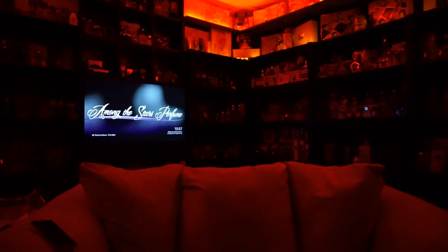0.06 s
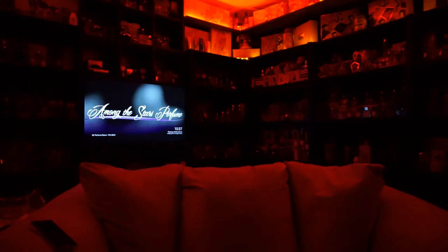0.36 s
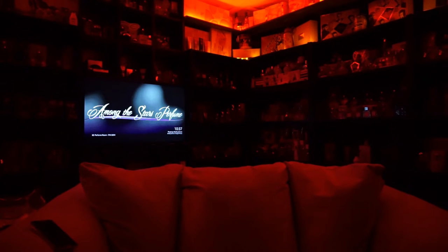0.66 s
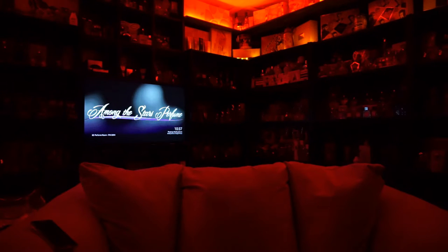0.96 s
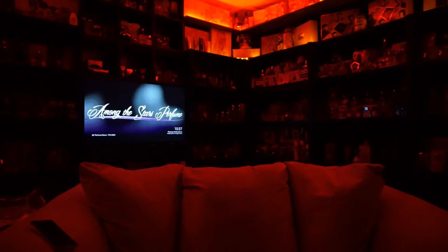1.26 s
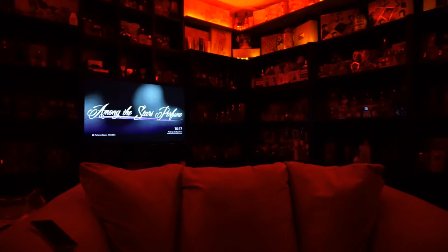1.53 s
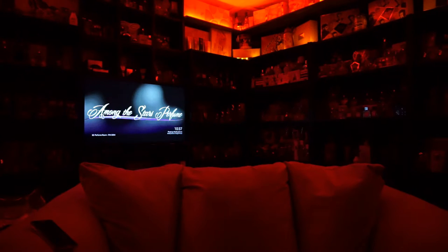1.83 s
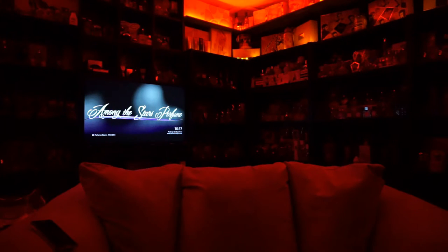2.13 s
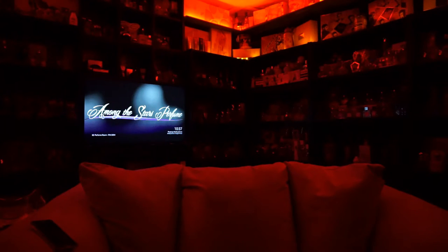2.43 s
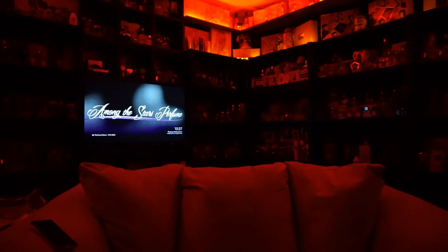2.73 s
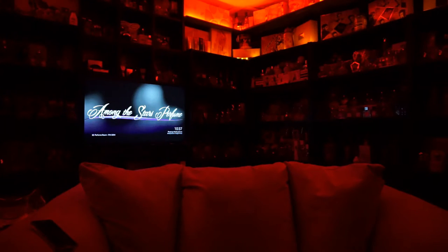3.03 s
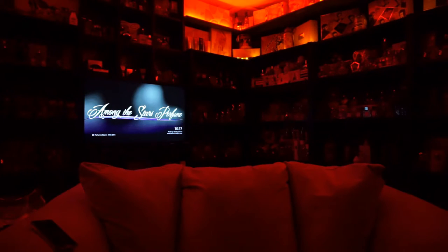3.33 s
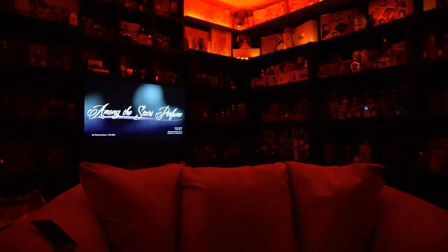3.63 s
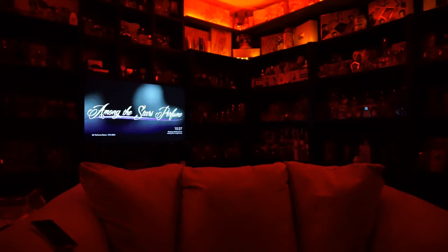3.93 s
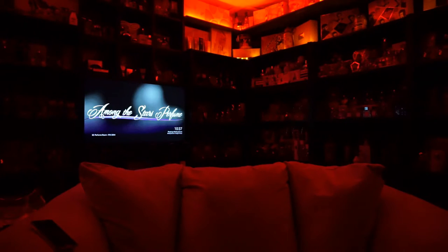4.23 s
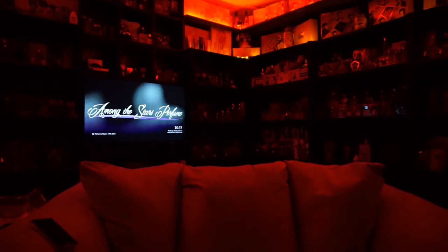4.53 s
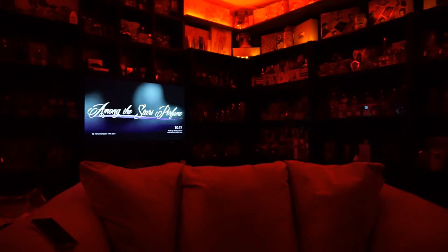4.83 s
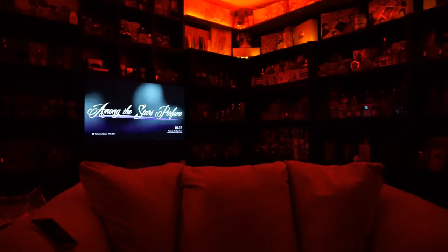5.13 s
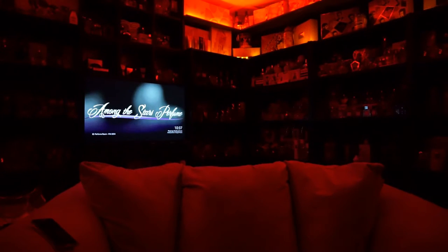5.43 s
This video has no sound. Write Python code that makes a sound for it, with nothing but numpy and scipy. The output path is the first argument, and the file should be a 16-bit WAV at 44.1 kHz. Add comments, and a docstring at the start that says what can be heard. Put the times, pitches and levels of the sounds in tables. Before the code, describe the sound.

Close, quiet handling sounds in a small room with little echo. Padded thuds like steps and light hollow taps lead to a sharp plastic snap, the loudest sound, followed by a run of knocks and short slides on a shelf with a deep bump. Clothes rub and swish, a small hard thing clinks as it is set down, and a spring catch clicks shut. A faint hiss lies underneath.

```python
"""Someone moves about a small, quiet, furnished room, starting with light taps, clicks and soft thuds.
About two seconds in, stiff plastic snaps free; a hard thing knocks and slides on a shelf, and
furniture gets a deep bump. Then come tiny cracks, a clink and, near the end, a sprung catch.
Each blow shakes a thing, which rings with its own tones and echoes briefly in the room.
All along, clothes rustle as they rub and glide, over a faint hiss."""
import sys
import numpy as np
from scipy import signal
from scipy.fft import rfft, irfft
from scipy.io import wavfile
from scipy.ndimage import uniform_filter1d

SR = 44100
rng = np.random.default_rng(int(sys.argv[2]) if len(sys.argv) > 2 else 0)


def generate_wav(sig):
    """Save sig (samples, or channels by samples) to the path in sys.argv[1] as 16-bit PCM at SR."""
    pcm = np.round(np.clip(np.atleast_2d(sig).T, -1, 1) * 32767).astype(np.int16)
    wavfile.write(sys.argv[1], SR, pcm)


N = 250488

# Knocks and pushes on the shelf: start_s, level_db, contact_s, treble_db
KNOCKS = [(2.267, -30.5, 0.0042, 7), (2.316, -25.5, 0.0036, 1), (2.343, -27.5, 0.0061, -3),
          (2.355, -31.5, 0.026, 0.5), (2.42, -33.5, 0.0058, 0.5), (2.499, -32.5, 0.0061, -9),
          (2.519, -33, 0.0064, -4.5), (2.644, -34, 0.017, -3), (2.898, -33.5, .007, -4),
          (2.979, -40.5, 0.0093, -41), (3.156, -39.5, 0.0068, -7.5), (3.5, -34, 0.005, -26),
          (3.592, -30, 0.0033, -8.5), (3.681, -35, 0.015, -5.5), (3.699, -37.5, 0.026, -28),
          (5.655, -38, 0.0086, -28)]
SLIDES = [(2.59, -42, 0.13, -10), (2.746, -44.5, 0.1, -1), (3.096, -49, 0.034, -50)]
# The thing's colour (how strong its lows and highs are): pitch_hz, gain_db
KNOCK_COLOUR = [(150, -50), (340, -68), (520, -2.5), (1400, -4.5), (2300, -7.5), (4000, -13.5),
                (6200, -22.5), (8000, -31), (15000, -39)]
# The tones it rings with (narrow ones ring longer): pitch_hz, width_hz, gain_db
KNOCK_TONES = [(535, 34, 2), (865, 65, 4), (1230, 50, 0), (1890, 100, 8), (2100, 130, 3.5),
               (5900, 260, -21)]

def shelf_knocks():
    """A hard thing held in the hand bumps on a shelf; a long contact makes a slide."""
    return blows(KNOCKS + SLIDES, KNOCK_COLOUR, KNOCK_TONES, tick_db=-13, pan_db=0.4, softness=0.21,
                 ripple_db=4, room_db=-3, bass_db=-7, held=True, left_lead_s=.00003, treble_hz=2920)

# The snap: start_s, level_db, contact_s, treble_db
SNAP = [(2.206, -19, 0.014, 0)]
# The plastic's colour: pitch_hz, gain_db
SNAP_COLOUR = [(120, -42), (300, -54), (1100, -6), (3500, -1), (5000, -8.5), (9000, -12.5), (15000, -12)]
# Its tones: pitch_hz, width_hz, gain_db
SNAP_TONES = [(486, 34, -1), (1034, 38, 3), (1278, 27, 22), (2470, 240, 5.5), (3150, 63, 12),
              (6130, 59, -0.5)]

def plastic_snap():
    """Stiff plastic snaps free and rings."""
    return blows(SNAP, SNAP_COLOUR, SNAP_TONES, tick_db=-8.5, pan_db=-1.5, softness=0.15,
                 ripple_db=3, room_db=-1.5, bass_db=5.5)

# Two touches on landing: start_s, level_db, contact_s, treble_db
CLINK = [(4.4935, -21.5, 0.0035, -0.5), (4.549, -41, 0.0091, -6)]
# The small thing's colour: pitch_hz, gain_db
CLINK_COLOUR = [(150, -45), (330, -2.5), (900, -24), (3000, -33), (4500, -20), (9000, -21), (15000, -39)]
# Its tones: pitch_hz, width_hz, gain_db
CLINK_TONES = [(986, 46, 14), (1294, 96, 12.5), (2460, 110, 1), (2840, 195, 5)]

def clink():
    """A small hard thing rings as it is set down."""
    return blows(CLINK, CLINK_COLOUR, CLINK_TONES, tick_db=-14, pan_db=-1, softness=0.15,
                 ripple_db=-0.5, room_db=-4, bass_db=-4.5, left_lead_s=-0.00042)

# Padded blows: start_s, level_db, contact_s, treble_db
THUDS = [(.369, -34.5, 0.019, 18), (1.311, -36, 0.0077, 4.5), (1.6735, -25, 0.0074, -3),
         (4.421, -43, 0.017, -29)]
# Their dull colour: pitch_hz, gain_db
THUD_COLOUR = [(100, -80), (220, -7), (400, -4), (800, 2.5), (1200, -15), (2400, -27), (4500, -49),
               (15000, -60)]
# Their tones: pitch_hz, width_hz, gain_db
THUD_TONES = [(365, 76, -8), (633.6, 38, 7), (767, 57, -7.5)]

def thuds():
    """Padded blows land softly, like steps."""
    return blows(THUDS, THUD_COLOUR, THUD_TONES, tick_db=-14, pan_db=0, softness=0.21,
                 ripple_db=4.5, room_db=-2, bass_db=-11.5, left_lead_s=.00004, treble_hz=1150)

# The catch's three moves: start_s, level_db, contact_s, treble_db
CATCH = [(5.258, -33.5, 0.021, -12.5), (5.272, -36, 0.056, 2), (5.296, -31, 0.012, 7)]
# Its colour: pitch_hz, gain_db
CATCH_COLOUR = [(120, -33), (350, -29), (800, -9), (1300, 4.5), (2700, 1), (4200, -4), (9000, -21),
                (15000, -12)]
# Its tones: pitch_hz, width_hz, gain_db
CATCH_TONES = [(1800, 49, 14), (2217, 51, 13), (2485, 60, 11.5), (4920, 120, 5), (5820, 240, 1.5),
               (8100, 200, 0.5), (9620, 170, 3)]

def sprung_catch():
    """A catch on a spring gives, scrapes and shuts."""
    return blows(CATCH, CATCH_COLOUR, CATCH_TONES, tick_db=-32, pan_db=-1.2, softness=0.034,
                 ripple_db=4.5, room_db=-1.5, bass_db=9)

# Deep bumps: start_s, level_db, contact_s, treble_db
BUMPS = [(2.915, -31, 0.0075, 0.88), (3.507, -46.5, 0.018, 0), (4.436, -48, 0.024, 0)]
# The furniture's colour: pitch_hz, gain_db
BUMP_COLOUR = [(70, -31), (150, -7), (600, -12), (1500, -8), (9000, -49)]
# Its tones: pitch_hz, width_hz, gain_db
BUMP_TONES = [(127, 18, -5.5), (223, 43, 3), (523, 83, 6.5)]

def furniture_bumps():
    """Bumped furniture answers with low tones."""
    return blows(BUMPS, BUMP_COLOUR, BUMP_TONES, tick_db=-5, pan_db=-0.5, softness=0.81,
                 ripple_db=-14.5, room_db=-4, bass_db=-1)

# Clicks and scuffs: start_s, level_db, contact_s, treble_db
CLICKS = [(.118, -48, 0.019, 7), (.669, -45.5, 0.011, 6.5), (.838, -38.5, 0.0086, -8.5),
          (.874, -46.5, 0.0031, -18), (1.612, -48, 0.0012, -7), (1.722, -49, 0.03, 1),
          (1.953, -49, 0.0083, -7), (2.166, -36.5, 0.021, 10.5), (2.193, -33, 0.0059, 10),
          (3.508, -42.5, 0.0054, 5), (5.4135, -36.5, 0.016, 6)]
# Their crisp colour: pitch_hz, gain_db
CLICK_COLOUR = [(120, -52), (350, 1), (1800, 7), (3000, 6), (5000, -4.5), (9000, -8.5), (15000, -12.5)]
# Their one tone: pitch_hz, width_hz, gain_db
CLICK_TONES = [(1150, 120, 1)]

def handling_clicks():
    """Things click and scuff as they are handled."""
    return blows(CLICKS, CLICK_COLOUR, CLICK_TONES, tick_db=-17, pan_db=0, softness=0.2,
                 ripple_db=2.5, room_db=-4.5, bass_db=-4, treble_hz=5600)

# Tiny cracks: start_s, level_db, contact_s, treble_db
CRACKS = [(4.4355, -39.5, 0.0011, -7), (4.442, -34, 0.0031, -5), (4.4593, -37, 0.0016, -6),
          (4.4623, -36.5, 0.0013, -8), (5.421, -48, 0.0004, 7)]
# Their bright colour: pitch_hz, gain_db
CRACK_COLOUR = [(150, -15), (400, -1), (1700, 1), (5000, -5), (10000, -2), (15000, -16)]
# Their tones: pitch_hz, width_hz, gain_db
CRACK_TONES = [(1620, 85, 9.5), (13800, 690, 3)]

def dry_cracks():
    """Little cracks, so close that they have hardly any echo."""
    return blows(CRACKS, CRACK_COLOUR, CRACK_TONES, tick_db=-20, pan_db=0.5, softness=0.6,
                 ripple_db=2, room_db=-13, bass_db=2)

# Light touches: start_s, level_db, contact_s, treble_db
TAPS = [(.212, -50, 0.01, -2), (.245, -40, 0.0037, -11), (.724, -39.5, 0.0019, -12.5),
        (.951, -46, 0.0073, -16), (.981, -43, 0.0036, -21), (1.031, -41, 0.003, -5),
        (1.776, -46.5, 0.0024, -19)]
# The hollow thing's colour: pitch_hz, gain_db
TAP_COLOUR = [(150, -75), (400, 1.5), (750, -5), (2500, -14), (5000, -16), (15000, -32)]
# Its tones: pitch_hz, width_hz, gain_db
TAP_TONES = [(543, 44, 2), (990, 73, -0.5), (1760, 80, 2), (2850, 200, -3), (3430, 190, 2)]

def hollow_taps():
    """A small hollow thing rings at a light touch."""
    return blows(TAPS, TAP_COLOUR, TAP_TONES, tick_db=-69, pan_db=2, softness=0.4,
                 ripple_db=-4, room_db=-4.5, bass_db=-10, treble_hz=2300)

# Soft shuffles: start_s, level_db, contact_s, treble_db
SHUFFLES = [(1.242, -53.5, 0.033, -2), (4.067, -46.5, 0.06, 0), (4.11, -41.5, 0.017, 2)]
# Their hollow colour: pitch_hz, gain_db
SHUFFLE_COLOUR = [(150, -48), (500, -1.5), (650, -19), (1350, 0), (1600, -19), (4000, -31), (15000, -50)]
# Their one tone: pitch_hz, width_hz, gain_db
SHUFFLE_TONES = [(840, 71, 4.5)]

def shuffles():
    """Long, gentle contacts make a hollow shuffling."""
    return blows(SHUFFLES, SHUFFLE_COLOUR, SHUFFLE_TONES, tick_db=-21, pan_db=0.5, softness=0.85,
                 ripple_db=2.5, room_db=-6, bass_db=-3)

def blows(rows, colour, tones, tick_db, pan_db, softness, ripple_db, room_db, bass_db,
          held=False, left_lead_s=0, treble_hz=4000, size=16384):
    """Each blow is a tick and a burst of contact noise that set the thing and the room ringing."""
    t, hz, out = np.arange(size) / SR, np.fft.rfftfreq(size, 1 / SR), np.zeros((2, N))
    low_cut = 1 / (1 + (125 / (hz + 30)) ** 8)
    ripple = evened(uniform_filter1d(uniform_filter1d(rng.standard_normal(len(hz)), 50), 30))
    overtones_db = ripple_db * ripple * hz / (hz + 2000)  # many weak high tones, alike in every blow
    tick = gain_of(tick_db) * evened(np.exp(-t / .00007))
    delay = np.exp(-2j * np.pi * hz * np.maximum([[-left_lead_s], [left_lead_s]], 0))
    for start_s, level_db, contact_s, treble_db in rows:
        power = (gain_of(2 * read(colour, hz)) + ringing(hz, tones, held)) * low_cut
        shape_db = overtones_db + 10 * np.log10(power) + bass_and_treble(hz, bass_db, treble_db, treble_hz)
        swell = 1 - np.exp(-t / (softness * min(contact_s, .014)))  # a soft contact starts gently
        chatter = evened(rng.standard_normal((2, size)) * swell * np.exp(-t / contact_s))
        drive = tick + stereo(chatter + gain_of(room_db) * room_echo(t))
        sound = irfft(rfft(drive) * delay * struck_filter(shape_db))
        opening_level = np.sqrt(np.mean(sound[:, :round(.02 * SR)] ** 2))
        add(out, start_s, gain_of(level_db) * sound / opening_level)
    return pan(out, pan_db)

def ringing(hz, tones, held, grip_detune=.04, grip_db=5):
    """How strongly a thing rings at each pitch; if held, the grip shifts each tone's pitch and level."""
    power = 0
    for pitch_hz, width_hz, gain_db in tones:
        pitch_shift, level_shift = held * rng.uniform(-1, 1, 2)
        pitch_hz *= 1 + grip_detune * pitch_shift
        away = 2 * (hz - pitch_hz)
        peak = gain_of(2 * (gain_db + grip_db * level_shift))
        power += peak / (1 + (away / width_hz) ** 2) / (1 + (away / pitch_hz) ** 4)
    return power

def struck_filter(db):
    """A filter with these gains that makes no sound before the blow (minimum phase)."""
    cepstrum = irfft(np.log(gain_of(db)))
    half = len(cepstrum) // 2
    cepstrum[1:half] *= 2
    cepstrum[half + 1:] = 0
    return np.exp(rfft(cepstrum))

# Faint high rings: start_s, level_db, pitch_hz
PINGS = [(.675, -47.5, 5980), (1.032, -50.5, 6440), (3.842, -53, 2640), (4.498, -35.5, 6240)]

def pings(attack_s=.0038, fade_60db_s=.2, width_hz=420, size=16384):
    """A nudged small thing rings at one high pitch, heard mostly off the walls."""
    t, hz, out = np.arange(size) / SR, np.fft.rfftfreq(size, 1 / SR), np.zeros((2, N))
    for start_s, level_db, pitch_hz in PINGS:
        band = 1 / (1 + (2 * (hz - pitch_hz) / width_hz) ** 2)
        ring = evened(irfft(rfft(rng.standard_normal((2, size))) * band))
        envelope = gain_of(level_db - 60 * t / fade_60db_s) * (1 - np.exp(-t / attack_s))
        add(out, start_s, envelope * ring)
    return out

# Dull, sticky rubs of cloth: start_s, length_s, level_db, treble_db
RUBS = [(0, 0.066, -47, -2), (.46, 0.033, -52, -44), (.69, 0.16, -48.5, -55), (.803, 0.092, -43.5, -12.5),
        (.94, 0.073, -50.5, -15), (1.545, 0.044, -46.5, -15), (1.74, 0.16, -49.5, -62),
        (2.08, 0.032, -46.5, -2), (2.125, 0.06, -43, -8), (2.84, 0.035, -48, -6), (2.89, 0.11, -43.5, -11),
        (3.305, 0.046, -47, -7.5), (3.35, 0.044, -41, -6.5), (3.405, 0.11, -34.5, -10.5),
        (3.56, 0.06, -43.5, -8), (3.7, 0.069, -56, -38), (3.985, 0.025, -51, -6), (4.12, 0.043, -42, -9.5),
        (5.19, 0.014, -52.5, -3), (5.41, 0.041, -42, -12), (5.48, 0.48, -56, -21)]

def cloth_rubs(attack_s=.001, release_s=.029, usual_db=-47.5):
    """Cloth under pressure takes hold, rubs and lets go."""
    def stroke(t, hz, start_s, length_s, level_db, treble_db):
        age = np.maximum(t - start_s, 0)
        envelope = (1 - np.exp(-age / attack_s)) * np.exp(-np.maximum(age - length_s, 0) / release_s)
        bass_db = 1.02 * (level_db - usual_db)  # pressing harder brings out the bass
        return envelope * gain_of(level_db + bass_and_treble(hz, bass_db, treble_db))
    return cloth_friction(RUBS, stroke, slip_share=0.18, patchy_db=2, pan_db=-0.8)

# Smooth glides of cloth: start_s, peak_time_s, level_db, bass_db
SWISHES = [(.8, 1.05, -51.5, 2), (3.98, 4.42, -45, -2), (5.28, 5.43, -46.5, 15.5)]

def cloth_swishes(fade_db_per_s=14):
    """Freely gliding cloth makes a hiss that swells and slowly dies."""
    def stroke(t, hz, start_s, peak_time_s, level_db, bass_db):
        swell = np.clip((t - start_s) / (peak_time_s - start_s), 0, 1)
        fade_db = fade_db_per_s * np.maximum(t - peak_time_s, 0)
        return swell * gain_of(level_db - fade_db + bass_and_treble(hz, bass_db, 0))
    return cloth_friction(SWISHES, stroke, slip_share=0.007, patchy_db=.6, pan_db=-2)

# The colour of rustling clothes: pitch_hz, gain_db
CLOTH_COLOUR = [(90, -37.5), (280, -6.5), (450, -3.5), (880, 3), (1300, -1), (2800, -2), (4300, -9),
                (8000, -15), (15500, -16.5)]

def cloth_friction(rows, stroke, slip_share, patchy_db, pan_db,
                   slips_per_s=70, spread_db=4, slip_s=.0065):
    """Rubbing noise shaped by each stroke; part of it grips and slips in little scuffs."""
    slips = (rng.random(N) < slips_per_s / SR) * gain_of(spread_db * np.minimum(rng.exponential(1, N), 2))
    scuffs = evened(signal.lfilter([1], [1, -np.exp(-1 / (slip_s * SR))], slips))
    noise = rng.standard_normal((2, N)) * np.sqrt(1 - slip_share + slip_share * scuffs ** 2)
    hz, t, bands = signal.stft(coloured(stereo(noise), CLOTH_COLOUR), SR, nperseg=512, noverlap=384)
    patches = uniform_filter1d(rng.standard_normal(bands.shape[1:]), 5, axis=0)  # uneven across pitch
    patches = evened(uniform_filter1d(patches, 12, axis=1))  # and over time
    strokes = np.sqrt(sum(stroke(t, hz[:, None], *row) ** 2 for row in rows))
    bands *= strokes * gain_of(patchy_db * patches)
    return pan(signal.istft(bands, SR, nperseg=512, noverlap=384)[1][:, :N], pan_db)

# How long the room echoes: pitch_hz, fade_60db_s
ECHO_TIMES = [(100, 0.31), (500, 0.17), (1500, 0.11), (5000, 0.2), (15000, 0.13)]

def room_echo(t):
    """Many reflections blur together, each pitch dying at its own speed."""
    hz, age, bands = signal.stft(rng.standard_normal((2, len(t))), SR, nperseg=256)
    bands *= gain_of(-60 * age / read(ECHO_TIMES, hz)[:, None])
    echo = signal.istft(bands, SR, nperseg=256)[1][:, :len(t)]
    return evened(echo * (1 - np.exp(-t / 0.015)))

# The colour of the hiss: pitch_hz, gain_db
HISS_COLOUR = [(25, -26), (110, -16.5), (250, -6), (480, 8.5), (900, 4), (1400, 4), (2600, 5.5),
               (5000, -4.5), (15000, -10)]

def hiss(level_db=-57.5):
    """Still air in the room, plus faint noise from each side of the microphone."""
    air = stereo(rng.standard_normal((2, N)))
    return gain_of(level_db) * coloured(air + rng.standard_normal((2, N)), HISS_COLOUR)

# How alike left and right are (1 means the same): pitch_hz, likeness
LIKENESS = [(100, 0.96), (250, 0.99), (500, 0.97), (1000, 0.66), (2000, 0.61), (4000, -0.19), (8000, 0.26),
            (15000, 0.17)]

def stereo(pair):
    """Sound from all around reaches two close microphone openings, which share the bass."""
    size = pair.shape[1]
    same = read(LIKENESS, np.fft.rfftfreq(size, 1 / SR))
    mid, side = rfft(pair) * np.sqrt([(1 + same) / 2, (1 - same) / 2])
    return irfft([mid + side, mid - side], size)

def bass_and_treble(hz, bass_db, treble_db, treble_hz=4000):
    """Gain in dB of two tone controls: bass (about 80-330 Hz) and treble."""
    bass = 1 / (1 + (hz / 330) ** 4) / (1 + (80 / (hz + 1)) ** 4)
    treble = 1 - 1 / (1 + (hz / treble_hz) ** 4)
    return bass_db * bass + treble_db * treble

def coloured(noise, colour):
    """Gives noise a colour, at an average level of 1."""
    return evened(irfft(rfft(noise) * gain_of(read(colour, np.fft.rfftfreq(N, 1 / SR))), N))

def read(points, hz):
    """Reads between a table's rows, with octaves evenly spaced."""
    pitch_hz, value = np.transpose(points)
    return np.interp(np.log(hz + 1), np.log(pitch_hz + 1), value)

def gain_of(db):
    """Turns decibels into a multiplier."""
    return 10 ** (np.asarray(db) / 20)

def evened(x):
    """Scales to an average (rms) level of 1."""
    return x / np.sqrt(np.mean(x ** 2) + 1e-20)

def pan(sound, db):
    """Makes the left side db louder than the right."""
    return sound * gain_of([[db / 2], [-db / 2]])

def add(mix, start_s, sound):
    """Mixes a sound in at start_s."""
    part = mix[:, round(start_s * SR):][:, :sound.shape[1]]
    part += sound[:, :part.shape[1]]

def scene():
    """The handled things, the clothes and the still room together."""
    things = thuds() + furniture_bumps() + shelf_knocks() + hollow_taps() + handling_clicks()
    things += dry_cracks() + plastic_snap() + clink() + sprung_catch() + shuffles()
    clothes = cloth_rubs() + cloth_swishes()
    return things + pings() + clothes + hiss()

def record(dry):
    """Cuts the very highest treble, above 15950 Hz."""
    return signal.oaconvolve(dry, signal.firwin(511, 15950, window=("kaiser", 9), fs=SR)[None], "same")

dry = scene()
out = record(dry)
generate_wav(out)
```